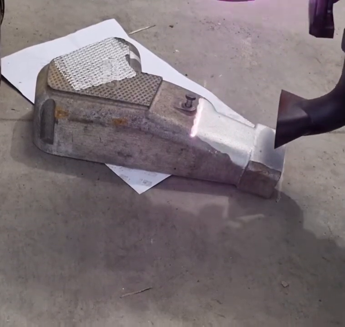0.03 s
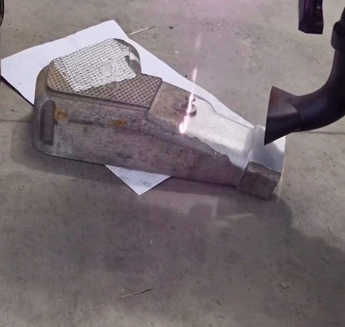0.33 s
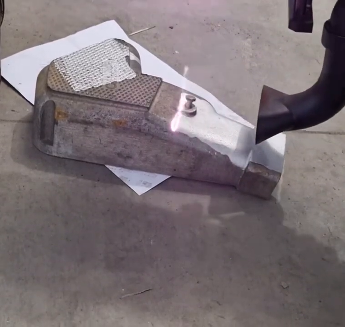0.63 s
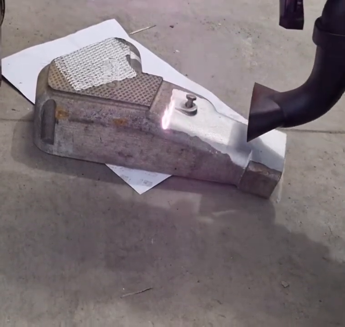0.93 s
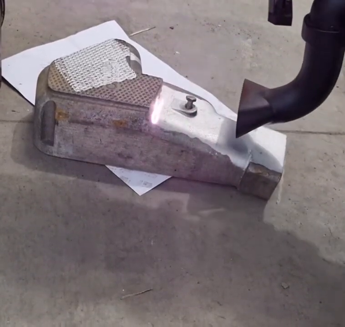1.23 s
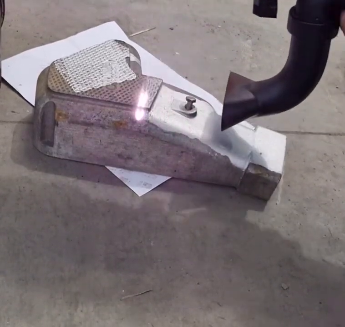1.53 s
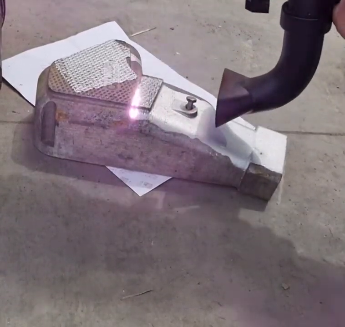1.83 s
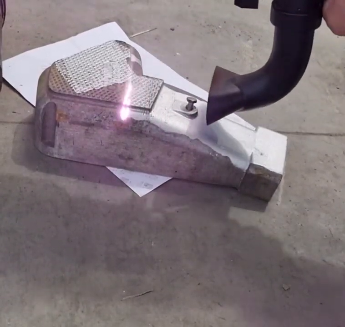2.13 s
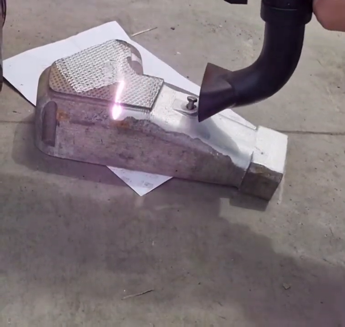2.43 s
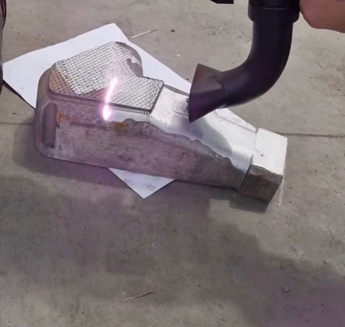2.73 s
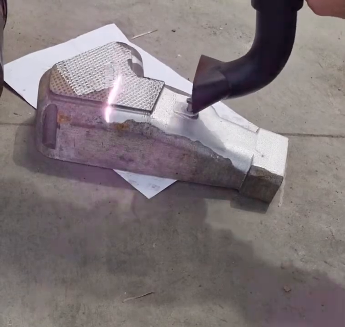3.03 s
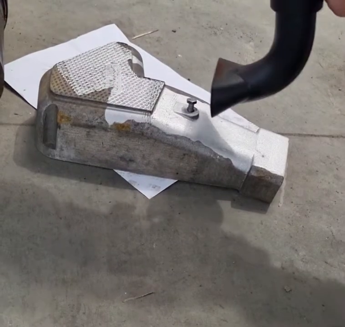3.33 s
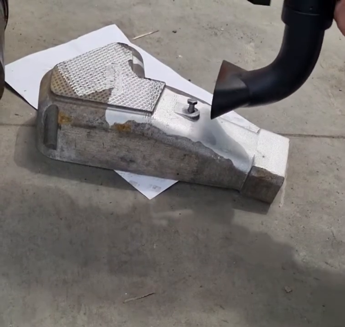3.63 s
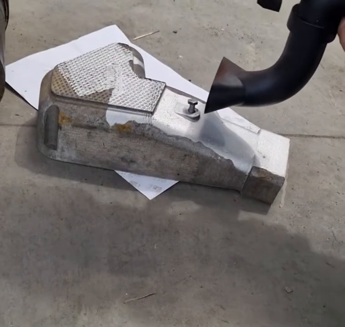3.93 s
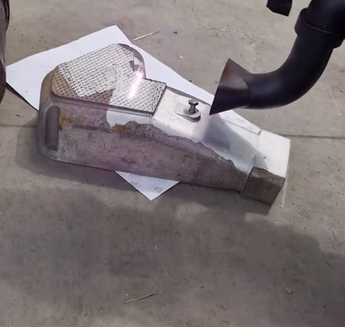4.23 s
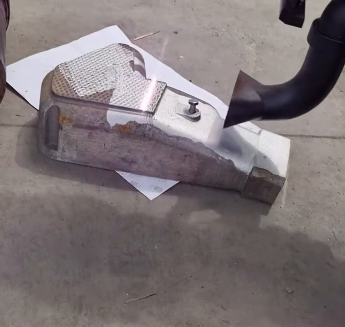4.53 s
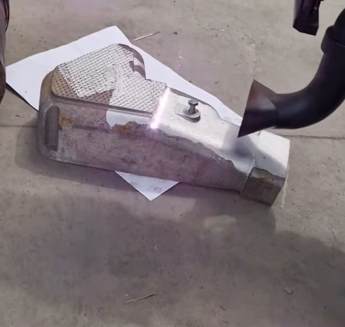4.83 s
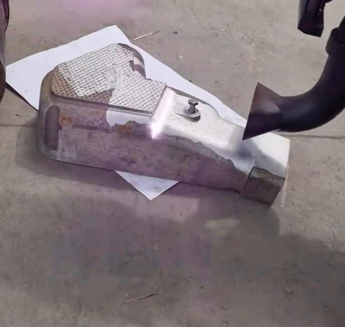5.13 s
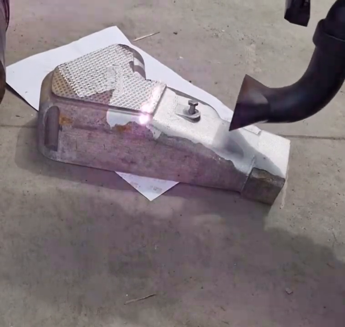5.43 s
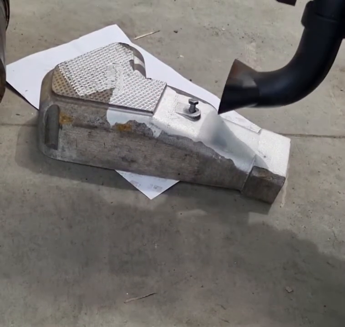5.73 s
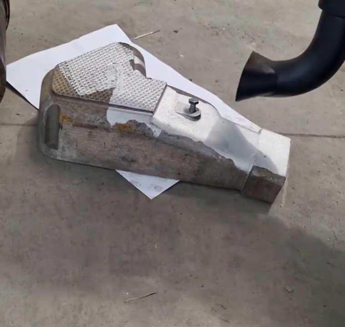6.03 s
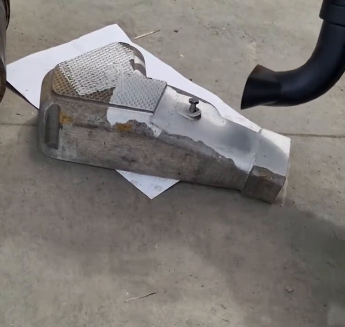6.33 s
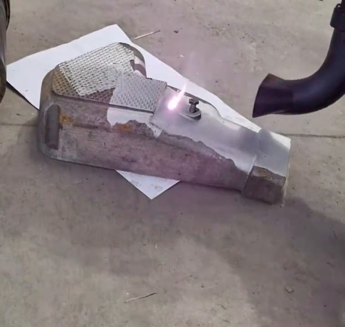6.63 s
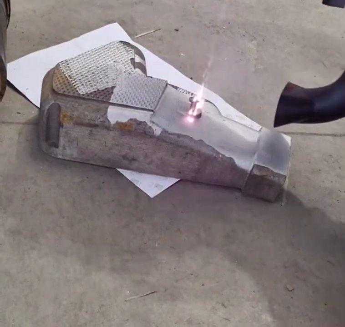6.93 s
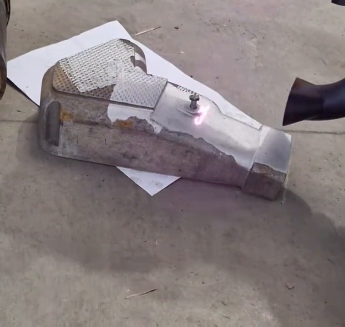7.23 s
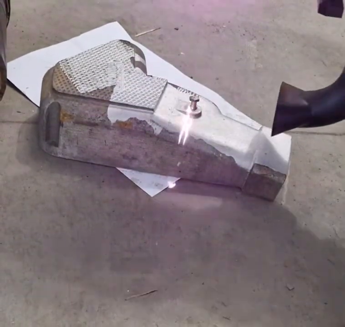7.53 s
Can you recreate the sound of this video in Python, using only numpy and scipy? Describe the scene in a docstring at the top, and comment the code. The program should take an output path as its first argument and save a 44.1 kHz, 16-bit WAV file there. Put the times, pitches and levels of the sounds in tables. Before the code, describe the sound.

A cleaning laser is already working on a rusty metal pedal at the start, making a high, piercing, sizzling whine that throbs very rapidly and wavers slightly in pitch. It sputters as it crosses dirt, with soft puffs and small sharp pops of flakes bursting off. The first burst dips briefly at 3 seconds, flares and cuts off at about 3.4 seconds. The second starts abruptly at 4.2 seconds, a little more sizzly, with several cracks around 5.5 seconds, and weakens before stopping at 5.9 seconds. The third begins at 6.8 seconds and runs to the end at about 7.6 seconds, with a cluster of pops and small thumps near 7.2 seconds. Throughout, a quieter fume extractor gives a steady hum, low duct rumble and rush of air, heard alone in the pauses. The sound is fairly close, with a short workshop echo.

```python
"""A high, throbbing, sizzling whine in three bursts: a pulsed laser strips rust from a cast metal pedal.
Each pulse is a tiny plasma snap, about 5000 a second. A mirror sweeps the spot to and fro, so the whine
throbs, bends in pitch and sputters wherever it crosses dirt; the plume puffs and loose flakes pop off.
The workshop echoes the laser, and a fume extractor hums and rushes throughout."""
import sys
import numpy as np
from scipy import signal
from scipy.fft import rfft, irfft, next_fast_len
from scipy.io import wavfile
from scipy.ndimage import uniform_filter1d, map_coordinates

SR = 44100
rng = np.random.default_rng(int(sys.argv[2]) if len(sys.argv) > 2 else 0)


def file_out(sig):
    """Save sig as 16-bit WAV at sys.argv[1]."""
    # one column per channel
    cols = np.atleast_2d(sig).T
    # limit, then scale
    lim = np.clip(cols, -1, 1)
    pcm = np.round(lim * 32767).astype(np.int16)
    wavfile.write(sys.argv[1], SR, pcm)


N = 335160
TIME_S = np.arange(N) / SR
PULSE_HZ, SWEEP_HZ = 4999.4, 23.5
LEFT_RIGHT = np.array([[.5], [-.5]])  # each channel takes half of a difference


def amp(db):
    return 10 ** (np.asarray(db) / 20)


def unit_rms(x):
    return x / np.sqrt(np.mean(x ** 2, axis=-1, keepdims=True) + 1e-20)


def log_interp(points, hz):
    """Rows of (f/Hz, value), interpolated on a log axis."""
    point_hz, values = np.transpose(points)
    return np.interp(np.log(hz + 1), np.log(point_hz + 1), values)


def curves(rows):
    """Each column after t/s, interpolated per sample."""
    times_s, *columns = np.transpose(rows)
    return np.array([np.interp(TIME_S, times_s, column) for column in columns])


def wobble(rate_hz):
    """Smooth random curve, rate_hz knots a second."""
    knots = rng.standard_normal(int(N * rate_hz / SR) + 4)
    fine = np.arange(len(knots) * 4) / 4
    return np.interp(TIME_S * rate_hz, fine, map_coordinates(knots, [fine]))


def filtered(x, response):
    """x through response(f/Hz)."""
    size = next_fast_len(N + SR // 4)
    return irfft(rfft(x, size) * response(np.fft.rfftfreq(size, 1 / SR)), size)[..., :N]


def coloured(x, spectrum):
    """x shaped by a spectrum, rms 1."""
    return unit_rms(filtered(x, lambda hz: amp(log_interp(spectrum, hz))))


def crackle(spectrum, spiky_db):
    """Noise whose strength jumps from one millisecond to the next."""
    return coloured(rng.standard_normal(N) * amp(spiky_db * wobble(SR / 64)), spectrum)


# Stereo width of the air: f/Hz, side minus mid/dB
AIR_WIDTH = [(40, 3), (70, -11), (130, -13.5), (250, -8), (700, 2.5), (4400, 1.5), (8000, 0)]
def rush(spectrum):
    """Moving air: stereo noise, rms 1."""
    mid, side = rng.standard_normal((2, N))
    side = filtered(side, lambda hz: amp(log_interp(AIR_WIDTH, hz)))
    return coloured(np.array([mid + side, mid - side]), spectrum)


# Fan tones: f/Hz, relative level/dB
FAN_TONES = [(52, -44), (74.8, -34), (125.5, -42.5), (204.6, -50), (823.6, -55), (1260, -58.5),
             (1857, -63.5)]
# Level of the low background rumble, swelling with the thumps near 7.2 s: t/s, relative level/dB
LOW_RUMBLE_LEVEL = [(0, -31.0), (2.9, -30.5), (3.15, -36.5), (3.6, -31.5), (4.9, -29.8), (5.9, -34.5),
                    (6.9, -30), (7.2, -25.2), (7.6, -31.5)]
# Duct rumble spectrum: f/Hz, relative level/dB
DUCT_SPECTRUM = [(15, -31), (30, -16), (48, -4.5), (70, -2.5), (100, -4), (128, -1.5), (150, 0),
                 (180, -15.5), (260, -20), (500, -49.5)]
# Nozzle rush spectrum: f/Hz, relative level/dB
NOZZLE_SPECTRUM = [(120, -28), (200, -6), (300, -4.5), (500, -8), (820, -7.5), (1250, -10), (1600, -15),
                   (3200, -15.5), (4900, -25.5), (7000, -28.5), (10000, -41.5), (16000, -50)]
def extractor(air_db, rumble_gain_db, hum_gain_db):
    """The fan's wavering tones, the rumble of its duct and the rush at the nozzle."""
    waver_rad = 0.41 * wobble(2.9) + 0.62 * LEFT_RIGHT
    hum = sum(amp(db + 1.15 * wobble(3.09)) * np.sqrt(2) * np.sin(2 * np.pi * hz * TIME_S + waver_rad)
              for hz, db in FAN_TONES)
    rumble = amp(rumble_gain_db + curves(LOW_RUMBLE_LEVEL)[0]) * rush(DUCT_SPECTRUM)
    air = amp(air_db + 0.33 * wobble(5.8)) * rush(NOZZLE_SPECTRUM)
    return (amp(hum_gain_db) * hum + rumble) * amp(LEFT_RIGHT * 0.17) + air


# Workshop reverberation: f/Hz, T60/s
HALL_DECAY = [(200, 0.8), (2000, 0.19), (5000, 0.63), (10000, 0.37), (15000, 0.34)]
def workshop(x, near_db, hall_db, near_t60_s):
    """Direct sound, close echoes that shift as the spot moves, and the hall; power is kept."""
    hz, frame_s, spectra = signal.stft(rng.standard_normal((2, 2, SR // 2)), SR, nperseg=256)
    decay = amp(-60 * frame_s / log_interp(HALL_DECAY, hz)[:, None])
    hall = signal.istft(spectra * decay, SR, nperseg=256)[1]
    t = np.arange(hall.shape[-1]) / SR
    hall *= 1 - np.exp(-t / 0.0055)
    near = rng.standard_normal(hall.shape) * amp(-60 * t / near_t60_s) * (t > .001)
    echoes = (amp(near_db) * unit_rms(near) + amp(hall_db) * unit_rms(hall)) / np.sqrt(len(t))
    here, there = signal.fftconvolve(np.float32(x[None]), np.float32(echoes), axes=-1)[..., :N]
    drift_rad = 2.492 * TIME_S + 0.59 * wobble(1.99)
    heard = unit_rms(x + np.cos(drift_rad) * here + np.sin(drift_rad) * there)
    heard *= np.std(x, axis=-1, keepdims=True)
    power = lambda v: np.abs(uniform_filter1d(v ** 2, size=SR // 6)) + np.var(v) / 10
    return heard * np.sqrt(power(x) / power(heard))


def placed(x, pan_db, phase_rad=-2.087):
    """Mono to stereo by a left-right difference in level and phase."""
    return filtered(x, lambda hz: np.exp(1j * LEFT_RIGHT * phase_rad)) * amp(LEFT_RIGHT * pan_db)


# Mirror cycle: start t/s, near turn within the sweep/ms, outward over return stroke/dB
MIRROR_TURNS = [(0, 5.1, 1), (2.02, 20.8, 1), (4.0, 12.7, -1), (4.96, 16.5, 2.5), (6.5, 16.3, -1.5)]
def mirror():
    """The mirror's progress through its sweep (0-1 from the near turn) and the outward stroke's lead."""
    start_s, turn_ms, lead_db = np.transpose(MIRROR_TURNS)
    row = np.maximum(np.searchsorted(start_s, TIME_S, 'right') - 1, 0)
    return (TIME_S - turn_ms[row] / 1000) * SWEEP_HZ % 1, lead_db[row]


# Dirty patches: start t/s, end t/s, place in the sweep/ms, bite/dB, fade/ms, relative flake level/dB
DIRT_PATCHES = [(0, 1.7, 3.4, 5, 2.7, -34), (0, 1.44, 10.8, 4, 2.1, -38), (.35, 1.37, 31.4, 0.5, 2.5, -48),
                (2.03, 3.23, 23.1, 5, 6.4, -35.5), (3.075, 4.15, 21.2, 4.5, 1.7, -40),
                (4.36, 5.2, 33.4, 7, 4.2, -35.5), (4.35, 5.6, 3.5, 5, 5.8, -36),
                (4.956, 5.44, 9.3, 17.5, 2.3, -28), (6.75, 7.3, 37.4, 6, 3, -33),
                (6.75, 6.8, 10, 5.5, 5.5, -31), (6.75, 7.1, 24.6, 6, 3.4, -36),
                (7.49, 7.6, 20.2, 12.5, 3.6, -26.5)]
def dirt_bite(rise_ms):
    """Snap strength: differs between the strokes and leaps at each dirty patch; mean power 1."""
    progress, lead_db = mirror()
    bite = uniform_filter1d(amp(lead_db * (progress < .5)), size=SR // 800)
    scatters_db = 0.42 * rng.standard_normal((len(DIRT_PATCHES), 256))
    for (start_s, end_s, place_ms, bite_db, fade_ms, _), scatter_db in zip(DIRT_PATCHES, scatters_db):
        on = (TIME_S > start_s) & (TIME_S < end_s)
        sweep, fraction = np.divmod((TIME_S[on] - place_ms / 1000) * SWEEP_HZ, 1)
        age_ms = fraction * 1000 / SWEEP_HZ
        shape = np.minimum(age_ms / rise_ms, 1) * np.exp(-np.maximum(age_ms - rise_ms, 0) / fade_ms)
        bite[on] += amp(bite_db + scatter_db[sweep.astype(int)]) * shape
    return bite / np.sqrt(uniform_filter1d(bite ** 2, size=round(2 * SR / SWEEP_HZ)))


def small_flakes(spread_db=2, thump_gain_db=-2.5, lag_s=.003):
    """Each crossing of a dirty patch throws off a flake of random size: t/s, crack/dB, thump/dB."""
    sweeps_s = np.arange(0, N / SR, 1 / SWEEP_HZ)
    rows = []
    for start_s, end_s, place_ms, _, _, size_db in DIRT_PATCHES:
        at_s = sweeps_s + place_ms / 1000 + lag_s
        crack_db, thump_db = size_db + spread_db * rng.standard_normal((2, len(at_s)))
        on = (at_s > start_s) & (at_s < end_s)
        rows += np.column_stack([at_s, crack_db, thump_db + thump_gain_db])[on].tolist()
    return rows


# Big flakes bursting off: t/s, relative crack level/dB, relative thump level/dB
BIG_FLAKES = [(0.314, -25, -23), (0.395, -24, -22), (0.601, -36, -21.5), (1.067, -25, -25),
              (1.11, -21, -31.5), (2.831, -21, -32), (2.962, -21.5, -20.5), (4.164, -19, -30),
              (4.85, -20, -35), (5.16, -25, -27), (5.456, -16.5, -38), (5.499, -38, -15), (5.54, -24, -27),
              (5.864, -24, -24.5), (7.116, -20, -21), (7.203, -23, -16), (7.211, -34, -16),
              (7.234, -35, -19), (7.276, -41, -21)]
# Flake fizz spectrum: f/Hz, relative level/dB
FIZZ_SPECTRUM = [(100, -22), (400, 4), (1100, 20.5), (1700, -10.5), (3500, 7), (6000, 5), (12000, -36),
                 (16000, -36)]
def flakes(crack_gain_db, thump_gain_db, fizz_gain_db, crack_s, thump_s):
    """Loose flakes flash off: each a small blast wave, a slower push of hot gas and a brief fizz."""
    blasts, fizz = np.zeros((2, N + SR))
    t = np.arange(SR // 32) / SR
    blast = lambda life_s: (1 - t / life_s) * np.exp(-t / life_s)
    for at_s, crack_db, thump_db in BIG_FLAKES + small_flakes():
        span = slice(round(at_s * SR), round(at_s * SR) + len(t))
        blasts[span] += amp(crack_db + crack_gain_db) * blast(crack_s)
        blasts[span] += amp(thump_db + thump_gain_db) * blast(thump_s)
        fizz[span] += amp(crack_db + fizz_gain_db) * np.exp(-t / 0.0033)
    softened = filtered(blasts[:N], lambda hz: 1 / (1 + 1j * hz / 2500) * hz / (hz + 120))
    return softened + fizz[:N] * crackle(FIZZ_SPECTRUM, spiky_db=3.5)


# Plume spectrum: f/Hz, relative level/dB
PLUME_SPECTRUM = [(60, -28), (150, 2), (300, -2), (600, -3.5), (1200, -6.5), (1600, -17.5), (2500, -30),
                  (4000, -15), (8000, -56)]
def plume(level, bite):
    """The plume puffs wherever the spot bites into dirt."""
    return level * bite ** 1.82 * crackle(PLUME_SPECTRUM, spiky_db=3.0)


def pulse_phase(reach_m):
    """The spot recedes and returns each sweep, which bends the pulse rate down and up."""
    position = 1 - np.abs(2 * mirror()[0] - 1)
    hand_drift_m = 0.0031 * wobble(3.12)
    delay_s = (reach_m * position + hand_drift_m) / 343
    return 2 * np.pi * PULSE_HZ * (TIME_S - delay_s)


# Spectrum of the scatter in pulse size: f/Hz, relative level/dB
PULSE_SCATTER = [(10, -34), (80, -11.5), (300, -9.5), (600, -13), (1200, -18), (2500, -24), (4000, -28),
                 (6000, -80)]
# Balance of the pulse-rate partial: t/s, left minus right/dB
FUNDAMENTAL_PAN = [(0.0, 5.0), (0.55, 0.5), (2.01, 2.5), (2.52, -5), (4.34, 0.5), (5.4, -5), (5.61, -1.5),
                   (7.6, 1)]
# Balance of partials 2 and 3: left minus right/dB
UPPER_PAN_DB = [.6, 2.5]
def whine(level, sizzle, roughness, bite, tone_gains_db, sizzle_gains_db, flutter_db, jitter_rad):
    """The even part of the pulse train whines; uneven pulse sizes sizzle round each partial."""
    phase = pulse_phase(reach_m=0.06)
    phase += jitter_rad * roughness * wobble(330)  # pits and scale shift the snaps in time
    clean_tone = np.clip(1 - .5 * roughness ** 2, 0, 1) * amp(flutter_db * wobble(260))
    rasp = 0.53 * roughness * wobble(330)
    even = level * bite ** 1.25 * (clean_tone + rasp)
    uneven = sizzle * bite ** 0.98 * crackle(PULSE_SCATTER, spiky_db=3.5)
    swing_rad = 0.34 * np.cos(2 * np.pi * mirror()[0])
    out = np.zeros((2, N))
    for k, pan_db in enumerate([curves(FUNDAMENTAL_PAN)[0], *UPPER_PAN_DB]):
        size = amp(tone_gains_db[k]) * even + amp(sizzle_gains_db[k]) * uneven
        stereo_rad = 1.696 - swing_rad + 0.86 * wobble(7)  # sweep and hand alter the path to each side
        partial = np.sqrt(2) * size * np.cos((k + 1) * phase + LEFT_RIGHT * stereo_rad)
        out += workshop(partial, near_db=-5, hall_db=-7.5, near_t60_s=0.056) * amp(LEFT_RIGHT * pan_db)
    return out


# Laser bursts: start t/s, end t/s
BURST_TIMES = [(0, 3.36), (4.155, 5.89), (6.757, 7.6)]
def firing(edge_s, kick_db, kick_s):
    """Burst gate. A burst's first pulses are stronger; the opening burst is already under way."""
    gate = np.zeros(N)
    for start_s, end_s in BURST_TIMES:
        rise = np.clip((TIME_S - start_s) / edge_s + 1, 0, 1)
        fall = np.clip((end_s - TIME_S) / edge_s + 1, 0, 1)
        kick = amp(kick_db) * np.exp(-np.abs(TIME_S - start_s) / kick_s) * (start_s > 0)
        gate += rise * fall * (1 + kick)
    return gate


# How hard the laser works, one list a burst, relative levels: t/s, whine/dB, sizzle/dB, plume/dB
WORK_LEVELS = [
    [(0, -28, -43, -34.5), (.25, -28, -42.5, -38), (.55, -23, -40, -33), (.85, -27, -43, -44.5),
     (1.12, -26.5, -38, -37.5), (1.7, -23.5, -40, -33), (2, -27, -41.5, -39.5), (2.13, -24.5, -40.5, -40),
     (2.92, -26.5, -40.5, -38), (3.01, -49, -52, -61), (3.24, -24, -34.5, -35.5), (3.36, -35.5, -40.5, -37)],
    [(4.155, -22.5, -35, -35.5), (4.27, -23.5, -35, -29.5), (4.35, -29.5, -38, -36.5),
     (4.45, -24.5, -37, -39), (4.88, -23.5, -34.5, -31.5), (4.99, -22, -33.5, -37.5),
     (5.14, -28, -37.5, -42), (5.48, -26.5, -37, -40), (5.62, -29.5, -39, -38.5), (5.89, -30, -42, -48)],
    [(6.757, -22.5, -35.5, -35.5), (6.92, -22.5, -36, -36.5), (7.03, -23, -35.5, -40),
     (7.2, -23.5, -34.5, -31), (7.43, -30.5, -40.5, -41.5), (7.6, -29, -36.5, -40)],
]
def laser():
    """Whine and sizzle of the pulse train, with the plume's puffs and the flakes' pops below them."""
    gate = firing(edge_s=0.002, kick_db=-1, kick_s=0.0051)
    whine_db, sizzle_db, plume_db = curves(sum(WORK_LEVELS, []))
    roughness = np.clip(1.5 + .073 * (sizzle_db - whine_db), 0, 1)  # more sizzle, rougher metal
    bite = dirt_bite(rise_ms=1.82)
    buzz = whine(gate * amp(whine_db), gate * amp(sizzle_db), roughness, bite,
                 tone_gains_db=[-.5, -3.5, 3], sizzle_gains_db=[5.2, 3, 8.5],
                 flutter_db=2.0, jitter_rad=0.41)
    puffs = plume(gate * amp(plume_db), bite)
    pops = flakes(crack_gain_db=14.5, thump_gain_db=13, fizz_gain_db=-1, crack_s=0.00015, thump_s=0.001)
    puffs = workshop(placed(puffs, pan_db=2.5), near_db=-5.5, hall_db=-18, near_t60_s=0.032)
    pops = workshop(placed(pops, pan_db=5), near_db=-11.5, hall_db=-21.5, near_t60_s=0.073)
    return buzz + puffs + pops


def scene():
    return laser() + extractor(air_db=-37.5, rumble_gain_db=-3.5, hum_gain_db=-1.5)


def record(dry):
    """Rounds off the tallest peaks and cuts the highest treble."""
    rounded = dry / (1 + (dry / .85) ** 6) ** (1 / 6)
    return filtered(rounded, lambda hz: hz < 15850)


dry = scene()
out = record(dry)
file_out(out)
```